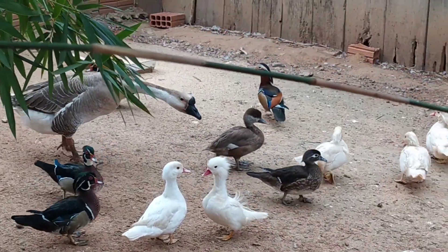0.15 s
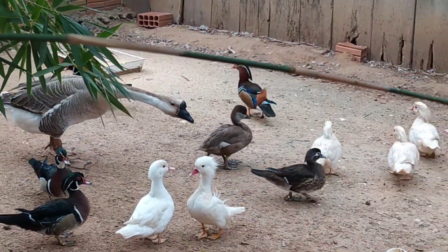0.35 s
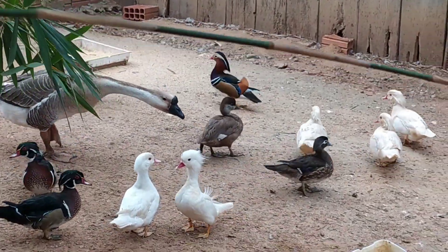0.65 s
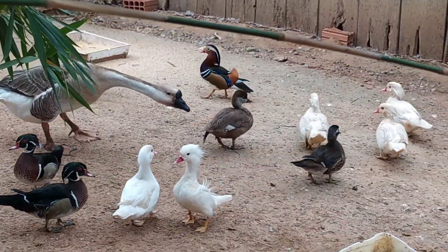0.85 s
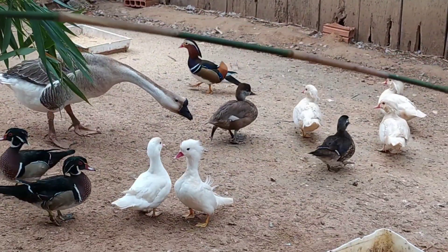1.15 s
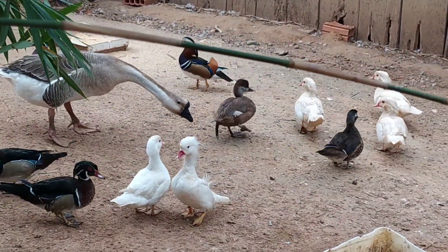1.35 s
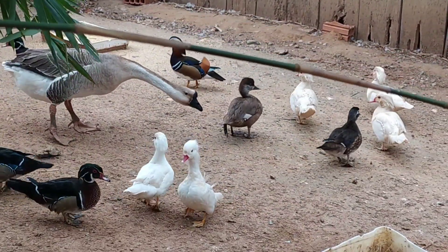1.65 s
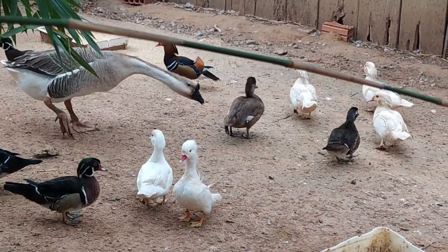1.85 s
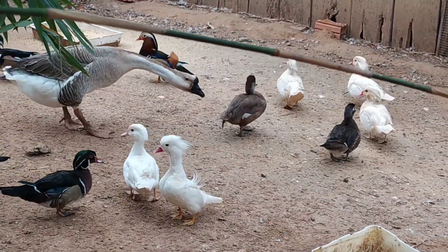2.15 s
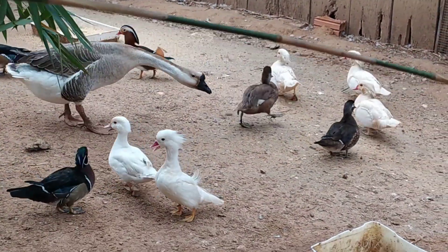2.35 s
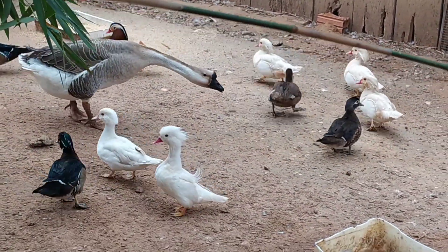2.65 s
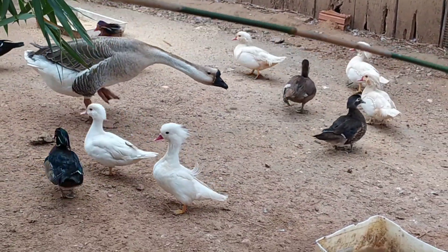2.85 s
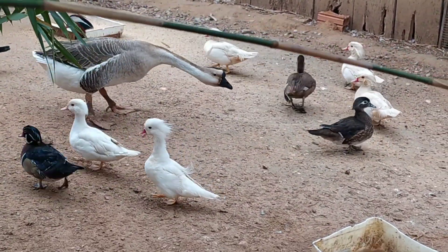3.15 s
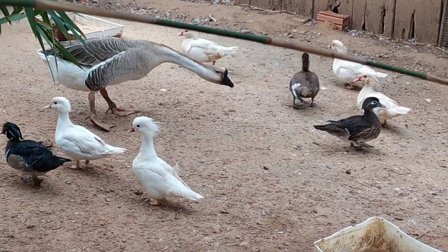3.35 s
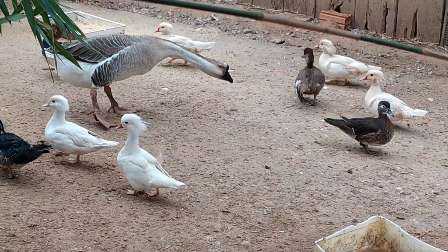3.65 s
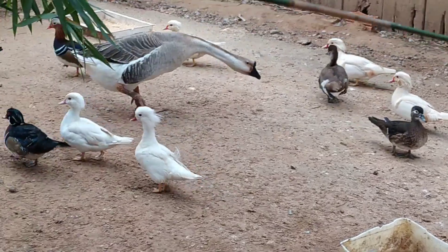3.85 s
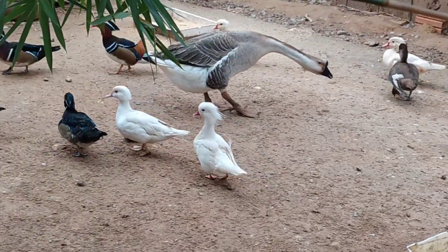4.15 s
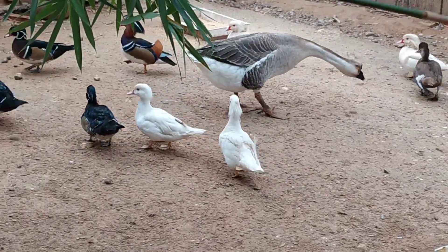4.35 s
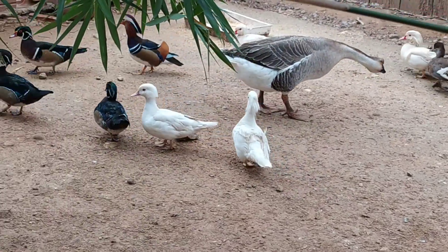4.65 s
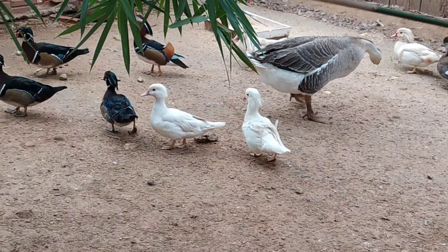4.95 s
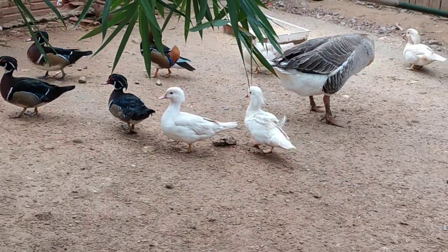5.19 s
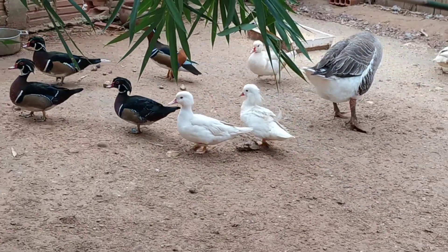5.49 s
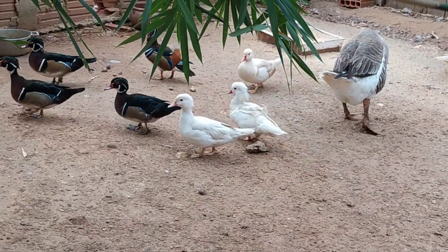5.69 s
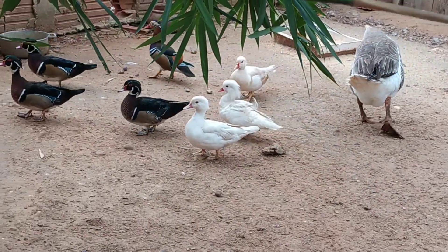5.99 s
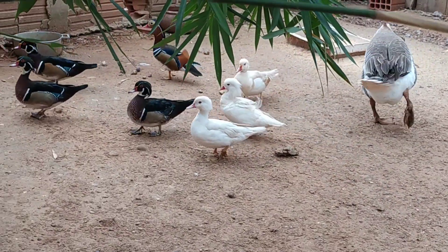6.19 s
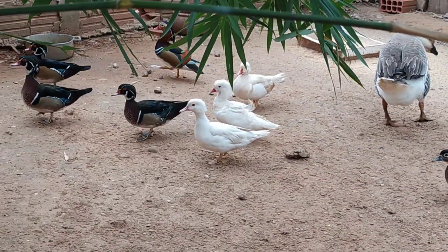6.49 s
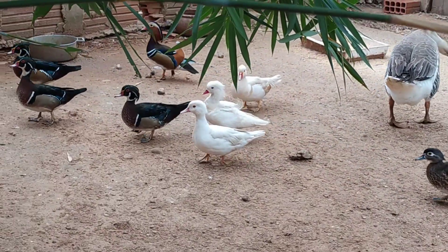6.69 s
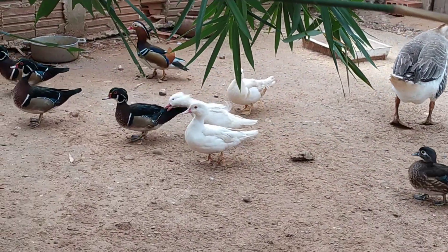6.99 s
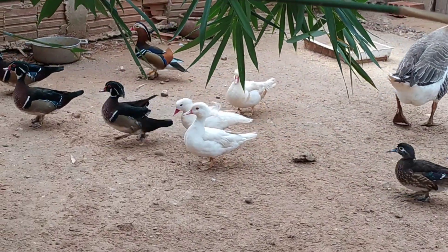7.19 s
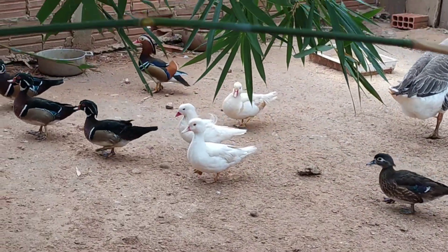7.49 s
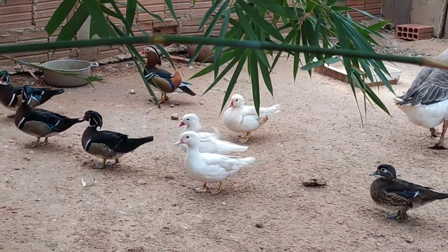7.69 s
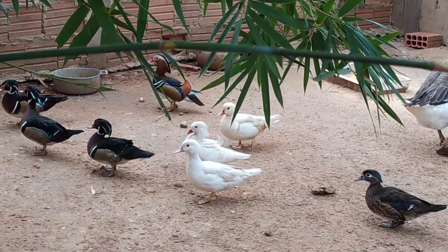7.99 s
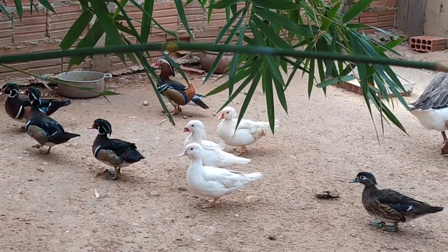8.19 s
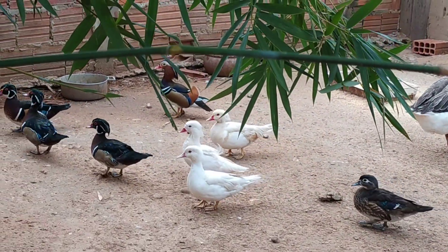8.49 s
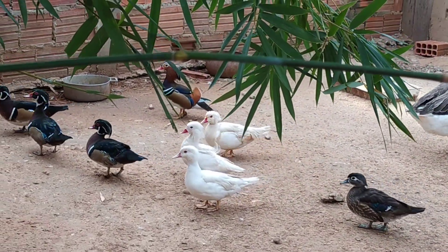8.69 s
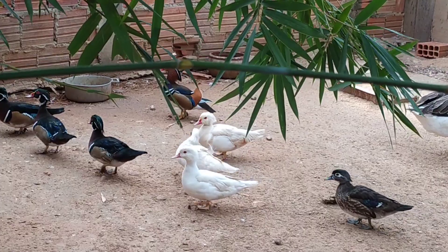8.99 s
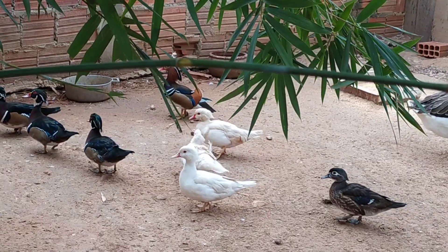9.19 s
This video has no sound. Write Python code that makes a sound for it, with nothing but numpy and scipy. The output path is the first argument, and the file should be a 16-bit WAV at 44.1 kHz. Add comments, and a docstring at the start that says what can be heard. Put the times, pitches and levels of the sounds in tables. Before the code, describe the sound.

Loud, hoarse goose honks with jumping pitch repeat nearby, with faint duck peeps and quiet outdoor hiss between them.

```python
"""In a walled dirt yard a goose honks six times, the last honk broken in two. Membranes in its throat
pulse and ring its windpipe and beak. The voice jumps between low, middle and high notes and turns
hoarse as the beak opens; the walls answer. Between honks ducks whistle, peep and quack, grit ticks
on the ground, and the yard hisses quietly."""
import sys
import numpy as np
from scipy import signal
from scipy.fft import rfft, irfft, next_fast_len
from scipy.io import wavfile
from scipy.ndimage import uniform_filter1d, map_coordinates

SR = 44100
rng = np.random.default_rng(int(sys.argv[2]) if len(sys.argv) > 2 else 0)


def generate_wav(sig):
    """Save sig (samples, or channels by samples) to the path in sys.argv[1] as 16-bit PCM at SR."""
    pcm = np.round(np.clip(np.atleast_2d(sig).T, -1, 1) * 32767).astype(np.int16)
    wavfile.write(sys.argv[1], SR, pcm)


N = 411894
SIDES = np.array([[.5], [-.5]])  # splits a difference between left and right

# Each row: start and end in seconds, lowest overtones in dB, fade-in and fade-out in seconds,
# hoarseness in dB, left side later in ms, left side louder in dB.
HONKS = [(0.237, 0.932, -4.5, 0.027, 0.3, 0.5, 0.32, 0.5), (1.545, 2.368, 0.5, 0.024, 0.2, 0.5, 0.22, -1),
         (3.098, 3.963, 0.5, 0.017, 0.2, 1, 0.23, -0.5), (4.794, 5.65, 0.5, 0.019, 0.099, 2, 0.029, 0),
         (6.263, 7.424, 4, 0.025, 0.16, 4, 0.02, 0.5), (8.345, 8.991, -3.5, 0.021, 0.077, 0, 0.021, 0),
         (9.01, 9.337, -1.5, 0.025, 0.19, -0.5, 0.022, 1)]
# Near surfaces colour each side. Each row: frequency in Hz, left louder in dB, left later in radians.
NEAR_SURFACES = [(330, 1, 0), (524.5, -7.5, 0), (700, 1, -0.53), (900, 3, 0.21), (1040, 5.5, 0.94),
                 (1220, 3.5, 1.5), (1400, -0.5, 2.1), (1650, 4, 0.76), (2200, 2.5, 0.5), (3000, -2, 0.87)]


def goose():
    """Each honk comes from its own spot, with its own echo; the chest hum is alike on both sides."""
    out = np.zeros((2, N))
    second_hz, strength = second_membrane()
    near_hz, near_db, near_phase = np.transpose(NEAR_SURFACES)
    for s, end, low_db, attack_s, release_s, hoarse_db, lag_ms, left_db in HONKS:
        def placement(f):
            lag = 2 * np.pi * lag_ms / 1000 * f * highs(f, 1400, 6)
            phase = np.interp(f, near_hz, near_phase) + lag
            gain = amp(1.5 + SIDES * (left_db + np.interp(f, near_hz, near_db)))
            return gain * np.exp(-1j * SIDES * phase)
        start = round(s * SR)
        controls = effort(s, end, attack_s, release_s, hoarse_db)
        voice = honk(controls, second_hz[start:], strength[start:], low_db)
        add(out, start, filtered(voice, placement))
        add(out, start, amp(-2.5) * filtered(walls(voice[0]), lambda f: highs(f, 900)))
    return out + chest()


# Each row: start in seconds, first and last pitch in Hz, windpipe level in dB, beak level above that
# in dB, windpipe peak in Hz, beak peak in Hz.
GOOSE_NOTES = [(0.239, 148.7, 171.5, -26.5, -8, 1290, 1700), (0.339, 227.6, 217.9, -21, -11, 1120, 2480),
               (0.39, 261.7, 272.2, -30, 1.5, 1320, 1570), (0.42, 172.1, 169, -27, -5, 1230, 1540),
               (0.478, 166.8, 185, -33.5, 2.5, 1240, 1670), (0.53, 267.7, 270.4, -22.5, 8, 1380, 1650),
               (0.561, 270.6, 267.6, -20.5, -13.5, 1350, 2540),
               (0.599, 269.8, 265.1, -20, 13.5, 1330, 1650), (0.634, 266, 265, -21, 0.5, 1337, 2714),
               (0.695, 218.3, 209.6, -24.5, 0, 1080, 2450), (0.743, 179.9, 151.4, -18.5, -1, 998, 1698),
               (1.546, 150.6, 162.9, -24.5, -11.5, 990, 1725), (1.639, 161.6, 163, -24, -8.5, 1160, 2630),
               (1.712, 160.3, 164.1, -27, -12, 940, 2000), (1.824, 220.6, 218.2, -22.5, -8, 1010, 1590),
               (1.918, 269, 271.1, -20, 7, 1106, 2801), (1.965, 274.5, 280.2, -19.5, -17, 1040, 1640),
               (2.004, 176.3, 181.1, -25.5, 0, 977, 1854), (2.139, 212.5, 228.8, -21, -10, 1137, 2054),
               (2.197, 266.7, 280.6, -16, -9, 1267, 2285), (2.284, 177.4, 155.3, -22.5, -4.5, 890, 2053),
               (3.103, 141.8, 170.8, -26.5, -8.5, 946, 1877), (3.202, 168.9, 161, -21.5, -4, 890, 2630),
               (3.247, 160.4, 158, -28.5, -10, 870, 2000), (3.378, 219.4, 220.9, -21.5, -10, 1184, 2063),
               (3.479, 276.1, 284, -23, 1, 865, 2640), (3.541, 162.3, 168.3, -28.5, -2.5, 886, 2092),
               (3.674, 214.7, 229, -22, -9.5, 1099, 2020), (3.755, 269.5, 279, -21, -5, 983, 2380),
               (3.85, 161.5, 146.2, -18.5, -31, 958, 2422), (4.796, 144.4, 167, -25.5, -15.5, 920, 1870),
               (4.909, 257.4, 257.3, -22.5, 1, 1230, 2360), (4.958, 151.8, 162.6, -27.5, -12, 906, 2560),
               (5.084, 218.2, 214.9, -21, -12.5, 1000, 2420), (5.165, 264.3, 268.2, -23.5, -5, 1150, 2440),
               (5.236, 175.2, 175.4, -28.5, -4, 980, 1700), (5.361, 220.7, 220.7, -22.5, -12.5, 1194, 1580),
               (5.435, 271.6, 269.5, -23.5, -7.5, 1143, 2236), (5.506, 164, 146.6, -31.5, -14.5, 880, 1975),
               (6.268, 148.4, 175.5, -29.5, -11, 950, 1800), (6.39, 265.5, 260.5, -30, -8.5, 1100, 2470),
               (6.456, 157.5, 169.7, -34, -6, 860, 2880), (6.564, 224.6, 222.9, -26.5, -6, 1236, 1930),
               (6.658, 271.8, 284, -26.5, 6, 906, 1800), (6.726, 223, 216.6, -26, -12.5, 794, 2060),
               (6.799, 179.4, 171.9, -39.5, 12, 820, 2400), (6.858, 169, 185.2, -30.5, -11, 900, 1780),
               (6.934, 227.6, 224.3, -30, 0.5, 1139, 2310), (7.05, 228.2, 233.3, -29.5, -3, 1150, 2300),
               (7.128, 273.3, 285.6, -26, 0, 1360, 2775), (7.183, 285, 278.8, -24.5, -2, 1400, 2436),
               (7.235, 176.8, 150.9, -35, -2, 914, 2210), (8.35, 137.7, 150.8, -27.5, -9.5, 845, 1750),
               (8.49, 141.9, 151.4, -27.5, -12, 827, 1850), (8.638, 199.5, 210, -25, -10.5, 1086, 1880),
               (8.724, 260.6, 256.2, -33.5, 7.5, 1260, 1520), (8.759, 254.7, 253.2, -23.5, -11, 1220, 2380),
               (8.81, 208.2, 203, -26, -3.5, 860, 2050), (8.871, 202.7, 212.8, -26, -8, 1097, 1930),
               (9.006, 317.7, 317.5, -37.5, 17, 1610, 1660), (9.042, 260, 261.4, -21, 3.5, 1304, 1610),
               (9.072, 262.4, 259.7, -19.5, -11, 1270, 2600), (9.105, 259.2, 262.3, -21, -6, 1204, 2060),
               (9.156, 211.6, 212.2, -22.5, -7, 900, 2020), (9.231, 171.5, 148.2, -22.5, -8, 896, 2130)]
# Hoarse pushes of breath. Each row: middle and half length in seconds, boost in dB, beak boost in dB.
BREATH_PUSHES = [(0.386, 0.039, 6.5, 4.5), (0.651, 0.01, 1.5, 4.5), (1.694, 0.041, 5, 6),
                 (1.98, 0.058, -1, 2.5), (2.207, 0.051, -1.5, 11), (3.249, 0.024, 2.5, 2),
                 (3.501, 0.019, 5.5, 4), (3.788, .03, -2, 11.5), (4.928, 0.03, 0, 0.5),
                 (5.183, 0.036, 1.5, 9), (5.448, 0.033, 2.5, 10.5), (6.406, 0.041, 3, 11),
                 (6.7, 0.033, 0.5, 1), (7.165, 0.044, 1, 7.5), (8.37, 0.011, 3, -3), (8.507, 0.015, 2.5, 4),
                 (8.667, .015, 4.5, -6), (8.763, 0.038, 12.5, -1), (9.072, 0.057, 1.5, 1)]
TENSE_HZ, JUMP_RATIO, SWELL_S = 195, 1.08, .066


def effort(start, end, attack_s, release_s, hoarse_db):
    """How the goose steers one honk: pitch glides or jumps, and loudness follows more slowly."""
    notes = np.array([row for row in GOOSE_NOTES if start - .03 < row[0] < end])
    note_s, first_hz, last_hz, pipe_db, beak_db, pipe_hz, beak_hz = notes.T
    t = np.arange(round(start * SR), min(round(end * SR), N)) / SR
    edges = np.append(note_s, end)
    k = np.clip(np.searchsorted(edges, t) - 1, 0, len(notes) - 1)  # the note now sounding
    progress = np.clip((t - edges[k]) / (edges[k + 1] - edges[k]), 0, 1)
    tense = first_hz[k] > TENSE_HZ
    # a leap up from a low note starts flat and slides into tune
    leap = tense & (first_hz[np.maximum(k - 1, 0)] < TENSE_HZ)
    scoop = 1 - .07 * leap * np.exp(-np.abs(t - edges[k]) / .01795)
    hz = scoop * (first_hz[k] + progress * (last_hz[k] - first_hz[k]))
    jumps = np.abs(np.log(first_hz[1:] / last_hz[:-1])) > np.log(JUMP_RATIO)
    odd = np.append(0, np.cumsum(jumps))[k] % 2 == 1  # flips at every jump
    at, half, *gains_db = np.transpose(BREATH_PUSHES)
    push_db, open_db = gains_db @ np.clip(1 - np.abs(t - at[:, None]) / half[:, None], 0, 1)
    # a tense note swells in its middle, a slack one sags to its end
    arch = tense * (np.sin(np.pi * progress ** .75) - .6)
    sag = ~tense * (.5 - progress)
    db = smooth(pipe_db[k] + 3 * arch + 4.5 * sag, SWELL_S) + push_db
    beak_db = smooth(beak_db[k] + 1.3 * arch, SWELL_S) + open_db
    # the rasp grows as the beak opens and the pitch rises
    rasp_db = -14.5 + hoarse_db + .41 * beak_db + 5 * np.log2(smooth(hz, SWELL_S) / 160)
    db -= 14 * np.clip(1 - (t - start) / attack_s, 0, 1)
    db -= 32.5 * np.clip(1 - (end - t) / release_s, 0, 1) ** 1.93
    return hz, db, beak_db, rasp_db, pipe_hz[k], beak_hz[k], push_db, odd


# Where the windpipe and beak ring. Each row: frequency in Hz, width in Hz, level in dB.
WINDPIPE_RINGS = [(248, 125, -6), (524.5, 83, -2.5), (925, 149, 6.5), (1187, 80, 5.5), (1314, 122, 2)]
BEAK_RINGS = [(1608, 176, 5), (2140, 367, 4), (2284, 107, 9.5), (2510, 163, 2.5), (2772, 350, 2),
              (3240, 1200, -12.5), (3504, 150, -8), (3720, 500, -9)]
# The colour of the rasp. Each row: frequency in Hz, relative level in dB.
RASP_COLOUR = [(1760, -64), (3000, -3.5), (3300, -3), (3840, 0.5), (4890, -4.5), (9130, -4.5), (11600, -23),
               (13500, -24), (15000, -62.5), (15500, -95)]


def honk(controls, second_hz, strength, low_db):
    """Membrane pulses, with a puff of breath each cycle, ring the windpipe and the open beak."""
    main_hz, db, beak_db, rasp_db, pipe_hz, beak_hz, push_db, odd = controls
    n = len(db)
    # notes take turns on two voices, the old fading under the new; the second membrane is a third
    held = np.array([nearest(~odd), nearest(odd), np.arange(n)])
    hz = np.array([*main_hz[held[:2]], second_hz[:n]])[:, None]
    fade = np.pi / 2 * np.clip(smooth(1. * odd, seconds=.031), 0, 1)
    shares = np.array([np.cos(fade), np.sin(fade), strength[:n]])
    # a slack membrane, low in pitch, beats less evenly
    slack = np.clip((230 - hz) / 70, 0, 1)
    waver = (.004 + .016 * slack) * wobble(n, 100) + (.003 + .009 * slack) * wobble(n, 22)
    phase = phase_of(hz * (1 + waver))
    voices = shares * overtones(phase, hz, slack, pipe_hz[held][:, None], beak_hz[held][:, None], low_db)
    loose = (shares[:2] ** 2 * slack[:2, 0]).sum(axis=0)
    pulses = unit(voices.sum(axis=0) * amp((2 + .62 * loose) * wobble(n, 90.17)))
    puff = 2 + (shares[:2] ** 2 * np.cos(phase[:2, 0] / 2) ** 4).sum(axis=0)
    breath = unit(filtered(puff * rng.standard_normal(n), lambda f: (f < 4500) * highs(f, 560)))
    into_pipe = pulses + (.05 + .18 * loose) * breath
    into_beak = pulses + (.12 + .26 * loose) * amp(push_db / 4) * breath
    pipe = steady(filtered(into_pipe, lambda f: rings(WINDPIPE_RINGS)(f) * (f < 1500)))
    beak = steady(filtered(into_beak, lambda f: rings(BEAK_RINGS)(f) * (f > 1480)))
    # the rasp scatters on its way, so each side hears its own
    rasp = unit(puff * patches(n, patchy_db=4)) + .8 * pulses
    rasp = steady(filtered(rasp, lambda f: amp(along(RASP_COLOUR, f))))
    rasp *= amp(.49 * wobble(n, 15.64))
    return amp(db) * (pipe + amp(beak_db) * beak + amp(rasp_db) * rasp)


def overtones(phase, hz, slack, pipe_hz, beak_hz, low_db):
    """Each voice is 32 flickering tones; those near the windpipe and beak peaks stand out."""
    step = 64  # samples between loudness updates
    order = np.arange(1, 33)[:, None]
    hz, slack, pipe_hz, beak_hz = [x[..., ::step] for x in (hz, slack, pipe_hz, beak_hz)]
    tone_hz = order * hz
    low = tone_hz < 810
    near = lambda peak_hz, width_hz: 1 / (1 + ((tone_hz - peak_hz) / width_hz) ** 2)
    upper = (.7 * near(2 * beak_hz, 70) + .4 * near(pipe_hz + beak_hz, 50)) * (tone_hz < 3500)
    bright = near(beak_hz, 70) + .4 * near(2 * pipe_hz, 70) + upper
    gain = .6 + .4 * slack + 2.5 * near(pipe_hz, 90) + (7.5 - 5 * slack) * bright
    flicker = blur(rng.standard_normal(tone_hz.shape), 20)
    gain *= amp((3.2 + 2 * low) * unit(flicker))
    # the lowest overtones fade as the voice jumps up, except near 545 Hz
    gain *= np.where(low, amp(low_db) * (.11 + slack ** 2.4 + .4 * near(545, 25)), 1)
    gain[2] *= (tone_hz[2] > 1480) | (hz[2] < 300)  # a shrill second note skips the windpipe
    gain = np.repeat(uniform_filter1d(gain, size=9), step, axis=-1)
    gain = uniform_filter1d(gain, size=step)[..., :phase.shape[-1]]
    return (gain * np.cos(order * phase)).sum(axis=1)


# Each row: start and length in seconds, pitch in Hz, first and last level in dB against the main voice.
SECOND_NOTES = [(0.39, .04, 210.5, -16.5, 3), (0.515, 0.052, 328.4, 17, 11), (0.566, .035, 217.9, -24, -18),
                (.6, 0.055, 330, 4, 4), (.655, 0.042, 219.2, -10, -14), (0.694, 0.039, 267.2, -1, -18.5),
                (.743, 0.055, 216, 10.5, -15), (1.925, 0.23, 220.3, -2, 12.5), (2.194, 0.036, 218.5, 14, 0),
                (3.755, 0.073, 219.1, 2.5, -2.5), (4.909, 0.048, 155.5, -6, 0), (6.392, .064, 166.9, -1, 5),
                (5.164, 0.067, 216.2, -1, -1), (5.435, 0.058, 215.4, -3.5, -5),
                (7.127, 0.11, 228.5, -2, -18.5), (8.751, 0.055, 206, -10, 3), (8.807, 0.074, 248, 1, -3),
                (9.042, 0.028, 317, -9, 2), (9.075, 0.13, 215.3, -2, -4)]


def second_membrane():
    """Pitch and strength of a second membrane, which at times sounds a note of its own."""
    hz, strength = np.ones(N), np.zeros(N)
    for s, length, pitch_hz, first_db, last_db in SECOND_NOTES:
        start, t, shape = swell(s, length, edge_s=.012)
        hz[start:start + len(t)] = pitch_hz
        add(strength, start, shape * amp(np.linspace(first_db, last_db, len(t))))
    return hz, strength


# Each row: start and length in seconds, level in dB, pitch in Hz.
CHEST_HUMS = [(0.279, 0.089, -37.5, 165), (0.402, 0.14, -36.5, 165.3), (0.752, 0.11, -39, 180.5),
              (1.58, 0.12, -51, 161.7), (1.843, 0.028, -43, 172.4), (2.01, 0.13, -38.5, 188.4),
              (2.264, 0.023, -47, 177.2), (3.131, 0.056, -46, 162.2), (3.257, 0.15, -44.5, 164),
              (3.534, 0.22, -44.5, 167.2), (3.813, 0.12, -45, 169.4), (4.841, 0.3, -40, 155),
              (5.225, 0.17, -41.5, 176.6), (5.473, 0.14, -42, 165.5), (6.313, 0.268, -37.5, 159.4),
              (6.727, 0.032, -43, 178), (6.793, 0.14, -37.5, 172), (7.146, 0.07, -47, 181.3),
              (7.256, 0.1, -36.5, 172.7), (8.386, 0.31, -45, 144), (8.858, 0.055, -45.5, 176.4),
              (9.199, 0.1, -42, 170)]


def chest(edge_s=.05):
    """The goose's chest hums: a low tone that swells and glides faintly on to the next hum."""
    gain = np.zeros(N)
    for s, end, *_ in HONKS:
        add(gain, round(s * SR), np.full(round((end - s) * SR), amp(-60.5)))
    for s, length, db, _ in CHEST_HUMS:
        start, t, shape = swell(s - edge_s / 2, length + edge_s, edge_s)
        add(gain, start, amp(db) * shape)
    s, length, _, hz = np.transpose(CHEST_HUMS)
    hum_hz = np.interp(np.arange(N) / SR, s + length / 2, hz) * (1 + .035 * wobble(N, 30))
    gain *= amp(3.3 * wobble(N, 25))
    return np.sqrt(2) * gain * np.sin(phase_of(hum_hz))


# Each row: start and length in seconds, first pitch in Hz, level in dB, flutter level in dB.
DUCK_WHISTLES = [(0.0, 0.19, 2220, -46.5, -57), (1.507, 0.17, 2300, -47.5, -50.5),
                 (2.455, 0.151, 2440, -47.5, -53)]
RISE_HZ_PER_S, WHISTLE_TOP_HZ = 20500, 5700


def duck_whistles():
    """Breathy whistles climb and grow fainter over a low flutter; the walls echo them."""
    out = np.zeros(N)
    for s, length, first_hz, db, flutter_db in DUCK_WHISTLES:
        start, t, shape = swell(s, length)
        hz = np.minimum(first_hz + RISE_HZ_PER_S * t, WHISTLE_TOP_HZ)
        phase = phase_of(hz * (1 + .05 * wobble(len(t), 1200)))
        flutter = unit(filtered(rng.standard_normal(len(t)), rings([(216, 26, 0)])))
        gain = amp(db - 5 * t / length + 3 * wobble(len(t), 56))
        add(out, start, shape * (gain * np.sin(phase) + amp(flutter_db) * flutter))
    return out + amp(-3.5) * walls(out)[:, :N]


# Each row: start and length in seconds, first and last pitch in Hz, relative level in dB,
# overtone boost in dB, waver as a share of the pitch.
DUCK_PEEPS = [(2.626, 0.26, 1150, 1005, -68, -21, 0.035), (2.922, 0.16, 1040, 1052, -76, -21, 0.042),
              (2.973, 0.12, 2976, 3000, -61.5, -18, 0.03), (4.079, 0.082, 2110, 1960, -87, 25, 0.041),
              (5.67, 0.21, 3040, 2970, -71, -20.5, 0.02), (5.702, 0.13, 2233, 2180, -76.5, -13.5, 0.0093),
              (7.362, .12, 2216, 2218, -53, -13.5, 0.029), (7.445, 0.16, 1947, 1698, -64, 2, 0.0515),
              (7.577, 0.12, 1675, 1702, -64, -9.5, 0.043), (7.692, 0.072, 1635, 1370, -61.5, -13, 0.094),
              (8.124, 0.041, 1273, 1285, -62.5, -21, 0.046)]


def duck_peeps():
    """Farther ducks peep: thin, wavering tones with two overtones, mostly in echo."""
    out = np.zeros(N)
    for s, length, first_hz, last_hz, db, over_db, waver in DUCK_PEEPS:
        start, t, shape = swell(s, length, edge_s=length / 3)
        hz = np.linspace(first_hz, last_hz, len(t))
        phase = phase_of(hz * (1 + waver * wobble(len(t), 299)))
        tone = np.sin(phase) + amp(over_db) * (.79 * np.sin(2 * phase) + .9 * np.sin(3 * phase))
        add(out, start, shape * amp(db + 4.9 * wobble(len(t), 42)) * tone)
    return 2.2 * out + amp(8.5) * walls(out)[:, :N]


# Each row: start and length in seconds, pulses a second, relative level in dB.
DUCK_QUACKS = [(1.02, 0.13, 180, -59), (2.69, 0.092, 210, -70), (4.045, 0.03, 230, -63),
               (6.112, 0.049, 200, -75), (8.113, 0.043, 180, -67)]


def duck_quacks():
    """Far, hoarse quacks: uneven pulses and breath ring a duck's throat, and the walls answer."""
    out = np.zeros(N)
    throat = rings([(890, 240, -4.5), (1650, 230, 5), (2270, 330, 2)])
    for s, length, rate, db in DUCK_QUACKS:
        start, t, shape = swell(s, length)
        phase = phase_of(rate * (1 + .04 * wobble(len(t), 80)))
        buzz = np.cos(phase / 2) ** 40 + .15 * rng.standard_normal(len(t))
        quack = unit(filtered(buzz - buzz.mean(), lambda f: throat(f) * (f > 600)))
        add(out, start, amp(db) * shape * quack)
    return 2 * out + walls(out)[:, :N]


# Each row: start in seconds, relative level in dB, left side louder in dB.
GRIT_TICKS = [(1.394, -44, 3), (2.5043, -47.5, 13), (2.5296, -47, 5), (2.5732, -41, 10), (4.4218, -54, 3.5),
              (8.041, -61.5, -1)]


def grit_ticks():
    """Dry ticks of grit, each a few milliseconds of bright noise."""
    out, t = np.zeros((2, N)), np.arange(1500) / SR
    decay = amp(-60 * t / .02) + .1 * amp(-60 * t / .21)
    for s, db, left_db in GRIT_TICKS:
        crack = rng.standard_normal((2, len(t))) * decay
        out[:, round(s * SR):][:, :len(t)] += amp(db + 3 + SIDES * left_db) * crack
    return filtered(out, rings([(2250, 1600, 7.9), (9200, 1000, 16)]))


# Each row: frequency in Hz, seconds the echo takes to fade by 60 dB.
ECHO_TIMES = [(150, 0.53), (1000, 0.24), (4000, 0.2), (12000, 0.0073)]


def walls(x):
    """The walls' echo comes a moment late, different on each side; its highs die first."""
    hz, t, noise = signal.stft(rng.standard_normal((2, SR // 2)), SR, nperseg=256)
    decay = amp(-60 * t / along(ECHO_TIMES, hz)[:, None])
    tail = signal.istft(noise * decay, SR, nperseg=256)[1]
    return signal.fftconvolve(np.pad(x, (350, 0))[None], tail / np.linalg.norm(tail[0]), axes=1)


# Each row: time in seconds, murmur level in dB, hiss level in dB.
AIR_LEVELS = [(0, -55, -54.5), (1.2, -54.5, -56), (2.7, -56.5, -56), (3.051, -52.5, -54), (4.2, -56, -53.5),
              (4.6, -57.5, -59), (6, -56.5, -61.5), (7.6, -56.5, -58), (8.2, -57, -60.5)]
# Each row: frequency in Hz, relative level in dB.
AIR_COLOUR = [(12, -34.5), (20, -4.5), (129, -17), (340, -17.5), (546, -23.5), (851, -21.5), (1220, -24.5),
              (2250, -19), (2890, -20.5), (3320, -22.5), (4510, -24), (8780, -8), (10700, -20.5),
              (13300, -25.5), (15300, -69)]
# Each row: frequency in Hz, how alike left and right are from 0 to 1.
AIR_LIKENESS = [(30, 0.23), (120, 0.72), (640, 0.63), (1400, 0.15), (15000, 0.061)]


def yard_air():
    """The yard's quiet noise: a low murmur and a high hiss that drift on their own."""
    def colour(f):
        spread = np.arccos(along(AIR_LIKENESS, f)) / 2
        return amp(along(AIR_COLOUR, f)) * [np.cos(spread), np.sin(spread)]
    middle, side = filtered(patches(N, patchy_db=3), colour)
    both = np.array([middle + side, middle - side])
    s, *levels = np.transpose(AIR_LEVELS)
    murmur_db, hiss_db = [np.interp(np.arange(N) / SR, s, db) for db in levels]
    murmur = filtered(both, lambda f: 1 / (1 + (f / 3800) ** 4))
    hiss = filtered(both, lambda f: highs(f, 3800))
    return amp(murmur_db) * unit(murmur) + amp(hiss_db) * unit(hiss)


def patches(n, patchy_db):
    """Two noises whose loudness shifts in patches of time and frequency."""
    noise = signal.stft(rng.standard_normal((2, n)), nperseg=512)[2]
    field = uniform_filter1d(rng.standard_normal(noise.shape[1:]), size=6, axis=0)
    field = uniform_filter1d(field, size=10, axis=1)
    return signal.istft(noise * amp(patchy_db * unit(field)), nperseg=512)[1][:, :n]


def amp(db):
    """Turn dB into a gain."""
    return 10 ** (np.asarray(db) / 20)


def unit(x):
    """Scale x to an average power of 1."""
    return x / np.sqrt(np.mean(x ** 2) + 1e-20)


def steady(x):
    """Hold the power of x near 1 all along."""
    return x / np.sqrt(np.abs(blur(x ** 2, 1300)) + 1e-9)


def smooth(x, seconds):
    """A running average."""
    return uniform_filter1d(x, size=max(1, round(seconds * SR)))


def blur(x, size):
    """A running average, taken twice."""
    return uniform_filter1d(uniform_filter1d(x, size), size)


def along(points, hz):
    """Read between (Hz, value) points, spaced by octaves."""
    f, values = np.transpose(points)
    return np.interp(np.log(hz + 1), np.log(f + 1), values)


def phase_of(hz):
    """The angle a tone has turned through, in radians."""
    return 2 * np.pi * np.cumsum(hz, axis=-1) / SR


def wobble(n, rate):
    """A smooth random curve through `rate` points a second."""
    return map_coordinates(rng.standard_normal(int(n * rate / SR) + 4), [np.arange(n) * rate / SR])


def filtered(x, response):
    """Scale and delay each frequency of x as `response` says."""
    size = next_fast_len(x.shape[-1] + 8192)
    return irfft(rfft(x, size) * response(np.fft.rfftfreq(size, 1 / SR)), size)[..., :x.shape[-1]]


def highs(f, edge_hz, steepness=4):
    """A gain that lets through what lies above edge_hz."""
    return 1 / (1 + (edge_hz / (f + 1)) ** steepness)


def rings(table):
    """The response of a body that rings at each (Hz, width in Hz, dB)."""
    return lambda f: sum((-1) ** k * amp(db) * 1j * f * width / (hz * hz - f * f + 1j * f * width)
                         for k, (hz, width, db) in enumerate(table))


def swell(s, length, edge_s=.0082):
    """A note's first sample, its own clock, and a 0-1 shape with soft edges."""
    t = np.arange(round(length * SR)) / SR
    ramp = np.clip(np.minimum(t, length - t) / edge_s, 0, 1)
    return round(s * SR), t, np.sin(np.pi / 2 * ramp) ** 2


def nearest(on):
    """For every sample, the nearest sample that is on."""
    at = np.flatnonzero(on)
    return at[np.round(np.interp(np.arange(len(on)), at, np.arange(len(at)))).astype(int)]


def add(into, start, x):
    """Mix x in with soft ends."""
    n = min(x.shape[-1], into.shape[-1] - start)
    into[..., start:start + n] += x[..., :n] * signal.windows.tukey(n, min(1, 400 / n))


def scene():
    """The goose in front, the ducks and the yard behind."""
    return goose() + duck_whistles() + duck_peeps() + duck_quacks() + grit_ticks() + yard_air()


# The microphone's two sides. Each row: frequency in Hz, left louder in dB.
MIC_BALANCE = [(25, -1.5), (110, 0.5), (500, 0), (4000, 3), (9000, 0), (13000, 1)]


def record(dry, top_hz=16050):
    """The microphone rounds off the loudest peaks, dulls the top treble and stops at top_hz."""
    def response(f):
        treble_loss_db = .0089 * np.clip(f - 14300, 0, None)
        return (f < top_hz) * amp(SIDES * along(MIC_BALANCE, f) - treble_loss_db)
    rounded = dry / (1 + np.abs(dry / .95) ** 8) ** (1 / 8)
    return filtered(rounded, response)


dry = scene()
out = record(dry)
generate_wav(out)
```